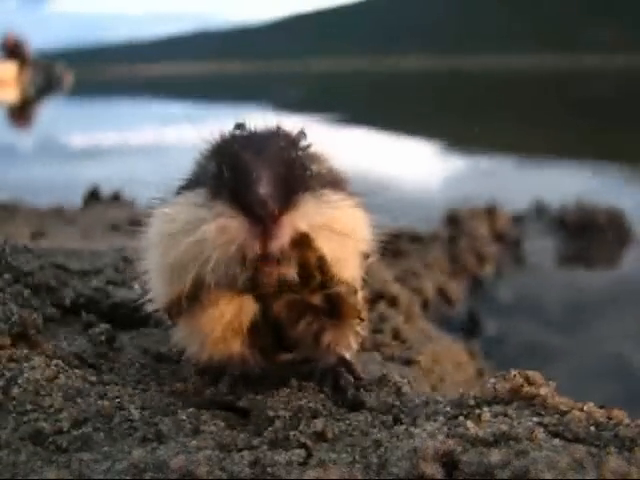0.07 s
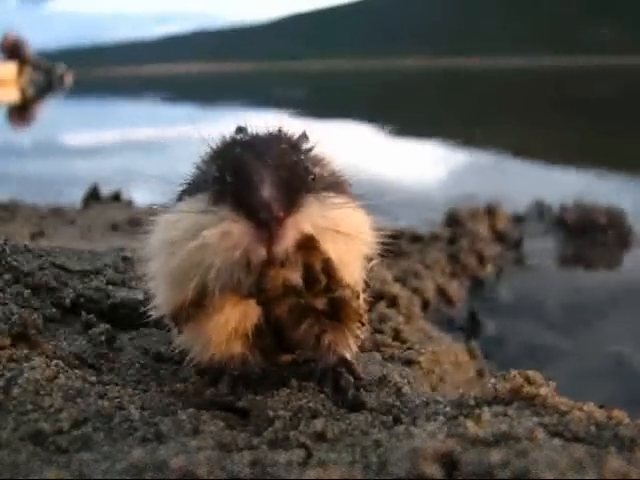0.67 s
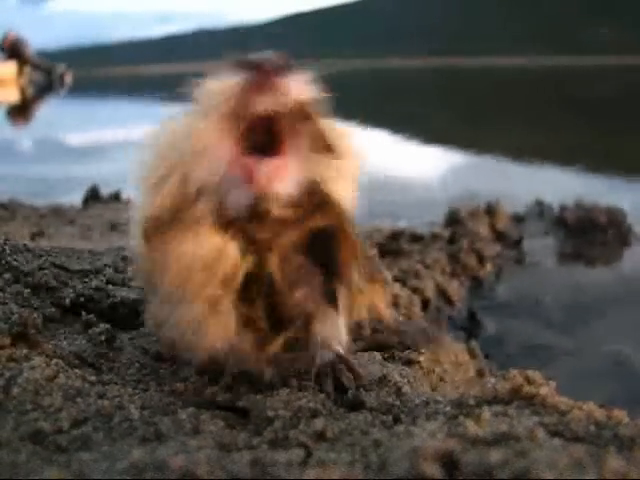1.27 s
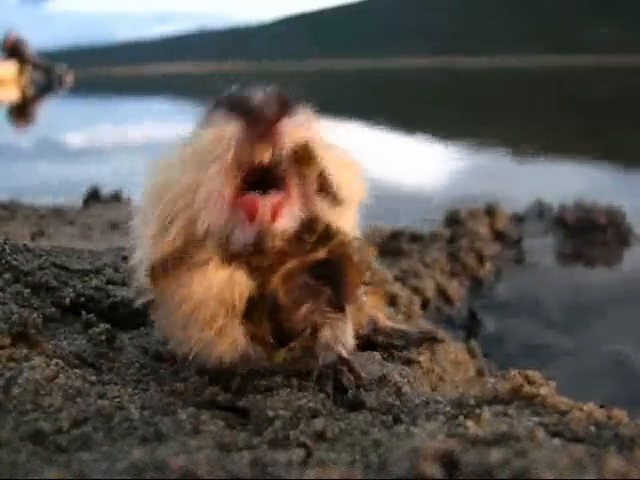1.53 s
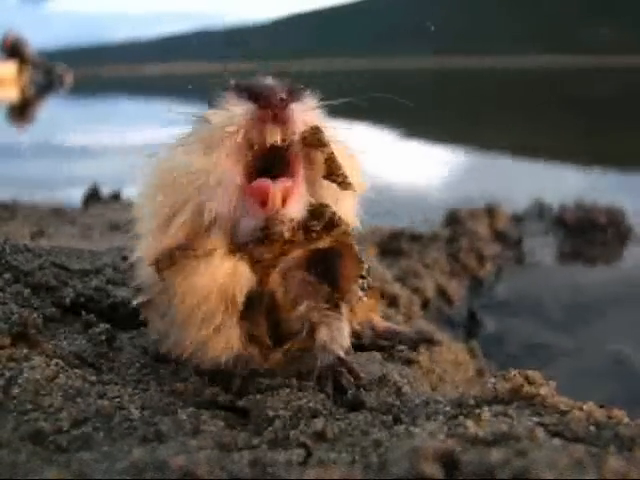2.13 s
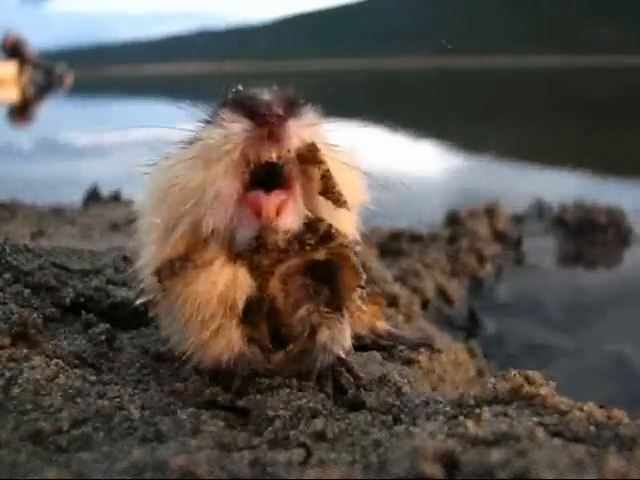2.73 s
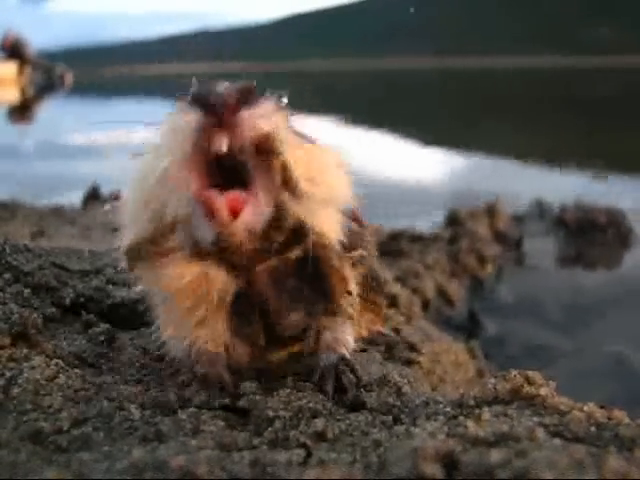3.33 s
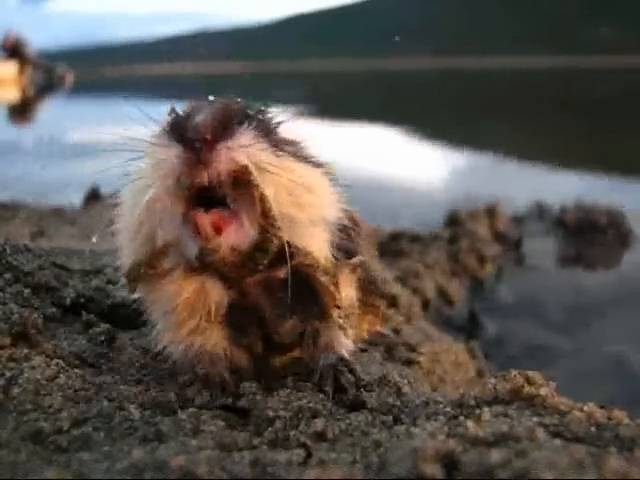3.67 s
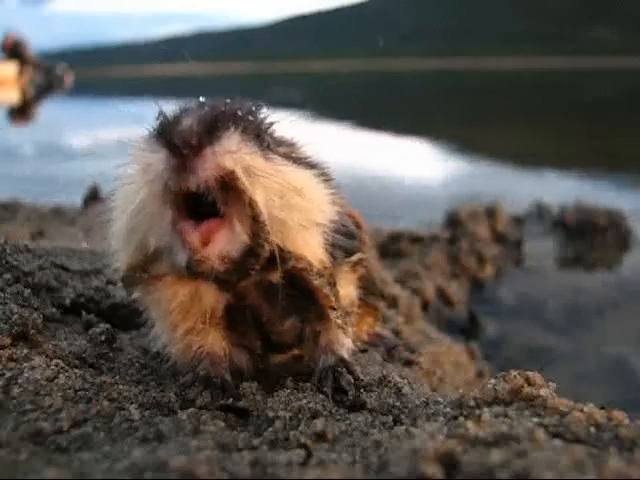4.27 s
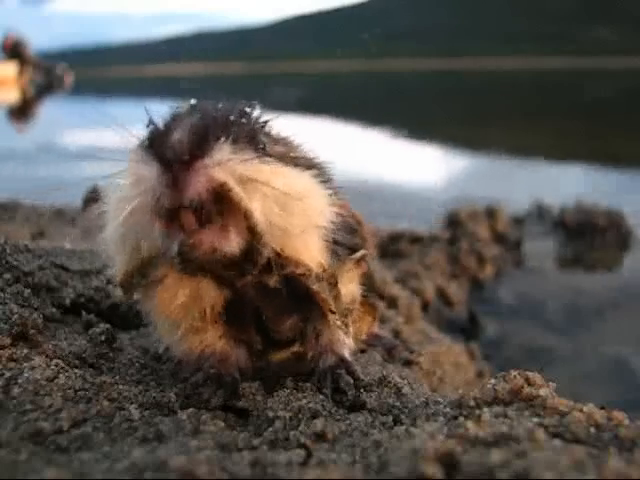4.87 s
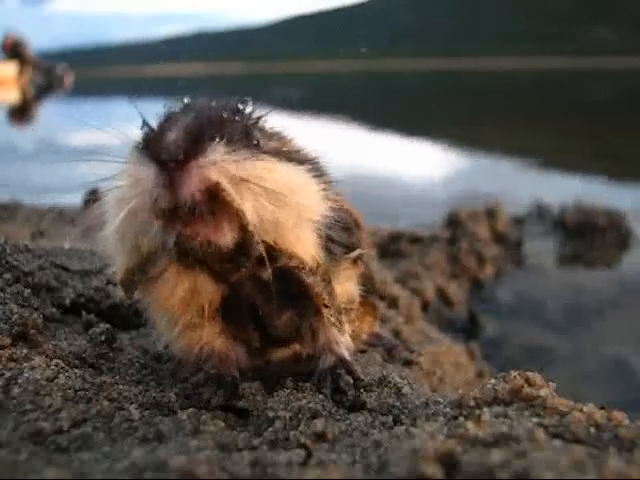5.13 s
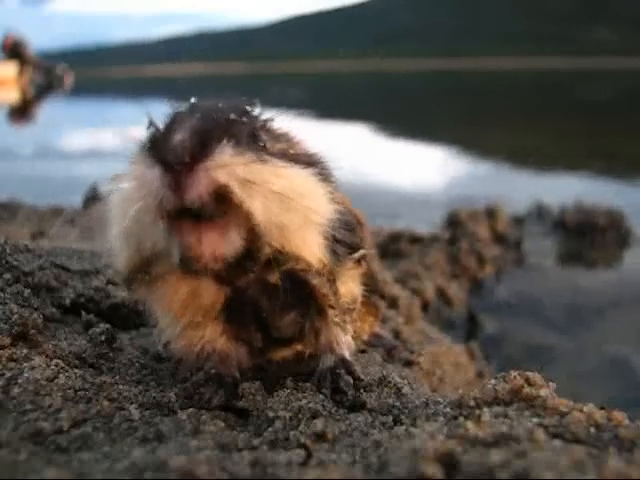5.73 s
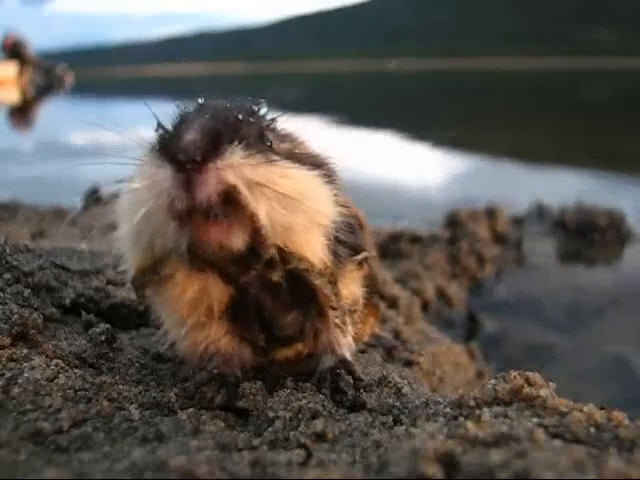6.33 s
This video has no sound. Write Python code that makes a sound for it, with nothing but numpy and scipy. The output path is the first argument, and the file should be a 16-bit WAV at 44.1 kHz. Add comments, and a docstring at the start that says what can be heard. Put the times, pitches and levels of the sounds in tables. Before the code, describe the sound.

A lemming a hand's width from the microphone gives a brief squeak and a few mouth ticks, then bursts into a fast, furious run of shrill squeaks, squeals and piercing shrieks. Hissy rasps, tiny grunts and quick gasps fall between the calls. The scolding thins out and ends with one more squeal and a small squeak. Faint air and wind rumble lie behind on a quiet lake shore.

```python
"""Shrill, furious scolding from a lemming a hand's width away, on a quiet lake shore. Its taut vocal
folds string together arched squeaks, held squeals and shrieks; between them the folds slacken into
rasps and low grunts, and it snatches air with a tick of the mouth. A low rumble and a soft thud sit
under each shriek and the last squeal. The microphone's two ports colour the treble differently.
Behind it lie faint air, wind rumble, a thin camera whine and a distant hum."""
import sys
import numpy as np
from scipy import signal
from scipy.fft import rfft, irfft, next_fast_len
from scipy.io import wavfile
from scipy.ndimage import uniform_filter1d

SR = 44100
rng = np.random.default_rng(int(sys.argv[2]) if len(sys.argv) > 2 else 0)


def generate_wav(signal):
    """Clip the signal to [-1, 1] and save it as 16-bit WAV at the path in sys.argv[1]."""
    frames = np.transpose(np.atleast_2d(signal))
    scaled = np.clip(frames, -1, 1) * 32767
    pcm = np.round(scaled).astype(np.int16)
    wavfile.write(sys.argv[1], SR, pcm)


N = 290795
T = np.arange(N) / SR

# quick in-breaths: start_s, length_s, level_db
GASPS = [(0.926, 0.075, -39.5), (1.182, 0.1, -31.5), (1.786, 0.11, -31.5), (2.337, 0.12, -32.5),
         (2.652, 0.092, -37), (2.964, 0.12, -27), (3.554, 0.12, -36.5), (3.864, 0.09, -38),
         (4.168, 0.097, -33), (5.72, 0.071, -42)]
# the highest calls: start_s, length_s, top_hz, climb_s, level_db, undertone_db, bite_db
SHRIEKS = [(1.438, 0.061, 10050, .007, -9, -43, 2.5), (2.052, 0.059, 9975, 0.009, -10, -45, 10.5),
           (3.256, 0.052, 10220, 0.0077, -10.5, -45, -12), (4.465, .084, 9994, 0.021, -11.5, -36, 23.5),
           (4.747, 0.088, 9020, 0.026, -10, -13, 11)]
# resonance of the open mouth, strongest at 7-8.5 kHz: freq_hz, gain_db
MOUTH_EQ = [(3000, -16.5), (4500, -21), (6000, -15), (7200, 2), (8500, 4), (10000, -17.5), (11500, -6)]
# hiss through the mouth in a rasp: freq_hz, gain_db
RASP_MOUTH_EQ = [(1500, -22.5), (3300, 18.5), (4700, -25), (6000, 0), (7400, 18), (8800, 11), (11000, -52)]
# hiss through the mouth forced wide open: freq_hz, gain_db
WIDE_MOUTH_EQ = [(400, -12), (1500, -7), (3200, -2.5), (4800, 3.5), (5800, 4.5), (7500, 13.5), (8800, 3.5),
                 (10000, 0.5), (11500, -50.5)]
# air and clicks at the teeth: freq_hz, gain_db
TEETH_EQ = [(400, -5), (3500, -9.5), (5500, 9), (7200, 16), (9000, 11), (11000, -6)]


def undb(db):
    """Decibels to gain."""
    return 10 ** (np.asarray(db) / 20)


def unit(x):
    """Scale to rms 1."""
    return x / np.sqrt(np.mean(x ** 2) + 1e-18)


def read(table, hz, column=1):
    """A column of a spectrum table at the given frequencies."""
    table = np.array(table)
    return np.interp(np.log(np.maximum(hz, 1)), np.log(table[:, 0]), table[:, column])


def colour(x, eq):
    """Shape a sound with an EQ curve."""
    size = next_fast_len(2 * len(x))
    return irfft(rfft(x, size) * undb(read(eq, np.fft.rfftfreq(size, 1 / SR))), size)[:len(x)]


def noise(eq):
    """Noise of rms 1, shaped by an EQ curve."""
    return unit(colour(rng.standard_normal(N), eq))


def smooth(x, hz):
    """One-pole lag."""
    keep = np.exp(-2 * np.pi * hz / SR)
    return signal.lfilter([1 - keep], [1, -keep], x)


def wander(hz):
    """Random drift of rms 1, rolled off above hz."""
    return unit(smooth(smooth(rng.standard_normal(N), hz), hz))


def span(start, length):
    """The samples of an event, and its progress u from 0 to 1."""
    where = np.arange(max(int(start * SR), 0), min(int((start + length) * SR), N))
    return where, np.linspace(0, 1, len(where))


def shore(side_db=-9, rumble_db=-13, whine_hz=8275, whine_db=-57):
    """Faint air over the lake, wind rumble at each port, and the camera's thin whine."""
    # tone of the open air: freq_hz, gain_db
    air_eq = [(15, -37.5), (25, 5), (700, 2.5), (2410, -2.5), (6110, -5.5), (8600, -2), (11200, -61),
              (14000, -83)]
    # background level, ducking after loud calls and recovering: time_s, level_db
    level_curve = [(0, -49.5), (1, -49), (2.5, -59), (3.7, -53), (4.2, -44), (5.3, -55.5), (5.85, -48),
                   (6.15, -59.5), (6.38, -49), (6.53, -38)]
    mid, side = noise(air_eq), noise(air_eq)
    rumble = np.array([wander(40), wander(40)])
    whine = wander(10) * np.sin(2 * np.pi * whine_hz * T)
    air = mid + undb(side_db) * side * np.array([[1], [-1]]) + undb(rumble_db) * rumble
    level_db = np.interp(T, *np.transpose(level_curve)) + 1.8 * wander(32)
    return air * undb(level_db) + undb(whine_db) * whine


def hum():
    """A faint low hum swells and fades in the distance."""
    # swells of the hum: start_s, length_s, pitch_hz, level_db
    swells = [(0.842, 0.25, 97, -54), (5.698, 0.18, 97, -53)]
    out = np.zeros(N)
    for start, length, hz, db in swells:
        where, u = span(start, length)
        envelope = np.abs(np.sin(np.pi * u)) ** .5
        out[where] += undb(db) * unit(envelope * np.sin(2 * np.pi * hz * T[where]))
    return out


def short_tail(x, db=-25, decay_s=.007):
    """A brief, faint, noisy smear after each call, different left and right."""
    t = T[:SR // 10]
    tail = rng.standard_normal((2, len(t))) * np.sqrt(t) * np.exp(-t / decay_s)
    tail /= np.linalg.norm(tail, axis=1, keepdims=True)
    return undb(db) * signal.fftconvolve(x[None], tail, axes=1)[:, :N]


def ports(x):
    """The camera body gives each microphone port its own notch and delay."""
    # left port against right: freq_hz, left_louder_db, left_lead_rad
    imbalance = [(2500, 0, 0), (4000, -3, 1), (4600, 1, 1.4), (5100, 9, 1.2), (5500, 3, -.9),
                 (6000, 0, -.9), (6500, -7, .6), (7200, 1, .3), (8000, -1, 0), (9000, -2, .7),
                 (11000, 1, 1.7)]
    hz = np.fft.rfftfreq(N, 1 / SR)
    lean = undb(read(imbalance, hz) / 2)
    left = lean * np.exp(.5j * read(imbalance, hz, column=2))
    pair_rms = np.sqrt((lean ** 2 + lean ** -2) / 2)
    return irfft(rfft(x) * np.array([left, 1 / left]) / pair_rms, N)


def thuds(shriek_db=-30, squeal_db=-23, squeal_s=(5.935, 5.968), thud_s=.0012, thud_db=8,
          rumble_db=-4, flutter_share=.45, flutter_hz=140, low_cut_hz=1.2):
    """A low rumble under each shriek and the last squeal, ending in a soft thud."""
    cues = [(start, start + length, shriek_db) for start, length, *_ in SHRIEKS]
    thud, gate = np.zeros((2, N))
    for start, end, db in cues + [(*squeal_s, squeal_db)]:
        thud += undb(db) * np.exp(-np.abs(T - end) / thud_s)
        gate += undb(db) * (T > start) * (T < end)
    flutter = wander(flutter_hz) + wander(flutter_hz) * np.array([[1], [-1]])
    rumble = smooth(gate, 33) * (1 + flutter_share * flutter)
    low_end = undb(thud_db) * thud + undb(rumble_db) * rumble
    return low_end - smooth(low_end, low_cut_hz)


def ticks(decay_s=.00024, over_gasp_db=13):
    """Tiny wet clicks ring in the mouth, alone or as it opens for a gasp."""
    # ticks of teeth and tongue: start_s, peak_db
    lone_ticks = [(0.4644, -11), (0.824, -24), (5.5376, -25), (6.335, -20)]
    out = np.zeros(N)
    for start, db in lone_ticks + [(start, db + over_gasp_db) for start, _, db in GASPS]:
        where, _ = span(start, .01)
        decay = np.exp(-(where - where[0]) / SR / decay_s)
        click = colour(rng.standard_normal(len(where)) * decay, TEETH_EQ)
        out[where] += undb(db) * click / np.abs(click).max()
    return out


def gasps(flutter_db=1.3, skew=.55, run_on_s=.025, run_on_db=-28.5):
    """Air past the teeth swells fast and dies away: drawn in, or running on after a shriek."""
    flow = np.zeros(N)
    run_ons = [(start + length, run_on_s, run_on_db) for start, length, *_ in SHRIEKS]
    for start, length, db in GASPS + run_ons:
        where, u = span(start, length)
        flow[where] += undb(db) * np.abs(np.sin(np.pi * u ** skew)) ** .54
    return flow * undb(flutter_db * wander(120)) * noise(TEETH_EQ)


def grunts(droop=.15, jitter=.033, shimmer_db=2.64, edge_s=.003, hiss_db=-12, harmonics=8):
    """The relaxed folds beat evenly and sag in pitch, with a small hiss on every beat."""
    # low voiced grunts: start_s, length_s, pitch_hz, level_db
    cues = [(0.715, 0.035, 393, -41), (1.071, 0.024, 428, -31), (2.57, 0.024, 460, -39),
            (2.816, 0.03, 463, -38), (2.862, 0.021, 448.7, -38), (3.783, 0.0314, 473.4, -38.5),
            (4.032, 0.023, 427.5, -34), (4.079, 0.032, 470, -32.5), (4.385, 0.026, 461, -49.5),
            (4.964, 0.025, 419, -38), (5.261, 0.024, 472, -35.5), (6.528, 0.024, 476.4, -26.5)]
    # resonance of the throat in a grunt: freq_hz, gain_db
    throat_eq = [(300, -3), (470, -0.5), (950, 2.5), (1400, -9), (2000, -11.5), (3000, -8.5), (4200, -55)]
    out, drift, air = np.zeros(N), wander(180), rng.standard_normal(N)
    for start, length, hz, db in cues:
        where, u = span(start, length)
        pitch = hz * np.exp(jitter * drift[where] - droop * (u ** 2 - 1 / 3))
        cycles = np.cumsum(pitch) / SR
        tone = sum(undb(read(throat_eq, k * pitch)) * np.sin(2 * np.pi * k * cycles)
                   for k in range(1, harmonics + 1))
        hiss = colour(air[where] * np.exp(-(cycles % 1)), RASP_MOUTH_EQ)
        edges = np.minimum(np.minimum(u, 1 - u) * length / edge_s, 1)
        out[where] += undb(db) * unit(edges * (unit(tone) + undb(hiss_db) * unit(hiss)))
    return out * undb(shimmer_db * wander(145))


def slap_cycles(slap_hz=390, jitter=.24):
    """Running count of the uneven slaps of the slack folds."""
    return np.cumsum(slap_hz * np.exp(jitter * wander(350))) / SR


def breaks():
    """How far the forced tone is broken up, 0 to 1."""
    # cracks in the voice: start_s, length_s, depth (0-1)
    cracks = [(1.085, .008, 0.86), (1.576, 0.013, 0.7), (2.193, 0.077, 0.36), (3.401, 0.017, 0.3),
              (4.327, 0.0096, 0.5), (4.38, 0.016, 0.98)]
    broken = np.zeros(N)
    for start, length, depth in cracks:
        broken[span(start, length)[0]] = depth
    return smooth(broken, 200)


def rasps(sung, cycles, scatter_db=-1.5, hiss_cycles=.79, throat_air=.38, edge_s=.0067, switch_s=.004,
          trade=.42, throat_duck_db=-16, mouth_duck_db=-9, wide_db=-22,
          catch_lead_s=.0058, catch_s=.001, catch_throat_db=-43, catch_mouth_db=-21):
    """Each slap of the slack folds rings the throat and lets a hiss through the mouth."""
    # rasping outbursts: start_s, length_s, throat_db, mouth_end_db, mouth_change_db
    outbursts = [(0.04, 0.012, -27, -19.5, 18), (0.219, 0.013, -42.5, -61, -6),
                 (1.066, 0.019, -20, -33.5, 14), (1.297, 0.03, -21.5, -22, 1.5),
                 (1.318, 0.061, -28.5, -11, 12), (1.532, 0.016, -40, -11.5, 25),
                 (1.576, .016, -40, -23.5, 17), (1.68, 0.038, -47.5, -25.5, -5),
                 (1.924, 0.09, -26.5, -10.5, 14.5), (2.147, 0.14, -48, -21.5, 4),
                 (2.464, 0.1, -34.5, -28.5, 2), (2.784, 0.14, -34.5, -31, -6),
                 (3.078, 0.025, -24.5, -2.5, 25), (3.338, 0.038, -44, -21.5, 9.5),
                 (3.394, 0.013, -48.5, -18.5, 6), (3.705, 0.061, -48.5, -41, -26.5),
                 (4.027, 0.034, -32, -37.5, 3), (4.288, 0.1164, -32.5, -30.5, -10),
                 (4.631, 0.067, -43, -42.5, -9), (4.885, 0.057, -58, -53, -31.5),
                 (5.903, 0.014, -23.5, -14, 6.5)]
    # resonance of the throat in a rasp: freq_hz, gain_db
    throat_eq = [(250, -18.5), (460, 0.5), (650, 1.5), (900, 8.5), (1450, -2), (3100, 0.5), (4500, -33.5),
                 (6500, -49)]
    # the voice catches just before each shriek
    catches = [(start - catch_lead_s, catch_s, catch_throat_db, catch_mouth_db, 0)
               for start, *_ in SHRIEKS]
    count = cycles.astype(int)
    strength = undb(scatter_db * rng.standard_normal(N))[count]
    slaps = np.diff(count, prepend=0) * strength
    hiss = np.exp(-(cycles % 1) / hiss_cycles) * strength * np.tanh(rng.standard_normal(N))
    throat, mouth, singing = np.zeros((3, N))
    for start, length, throat_db, mouth_db, change_db in outbursts + catches:
        where, u = span(start - .002, length + .004)
        wide = min(undb(mouth_db - wide_db) ** 2, 1)  # the mouth opens wider when forced
        edges = np.minimum(np.minimum(u, 1 - u) * length / edge_s, 1)
        air = hiss[where] * edges
        ring = unit(colour(slaps[where] * edges + throat_air * air, throat_eq))
        rush = unit(wide * colour(air, WIDE_MOUTH_EQ) + (1 - wide) * colour(air, RASP_MOUTH_EQ))
        # the throat fades as the hiss grows, and the other way round
        throat[where] += undb(throat_db - trade * change_db * (u + .5)) * ring
        mouth[where] += undb(mouth_db + change_db * (u - 1)) * rush
    # unbroken singing ducks the rasp
    for where, *_ in sung:
        singing[where] = 1
    singing = uniform_filter1d(singing, int(switch_s * SR)) * (1 - breaks())
    return throat * undb(throat_duck_db * singing) + mouth * undb(mouth_duck_db * singing)


def squeak(start, length, crest_hz, crest, db, octave_db, rise_oct=.68, fall_oct=.95, scoop_oct=.25,
           attack_s=.0008, release_s=.005, fade_db=-4):
    """An arch of pitch; the mouth lifts whichever harmonic sweeps through its resonance."""
    where, u = span(start, length)
    off_crest = np.where(u < crest, (crest - u) / crest, (u - crest) / (1 - crest))
    depth_oct = np.where(u < crest, rise_oct * crest, fall_oct * (1 - crest))
    onset = np.exp(-u * length / attack_s)
    pitch = crest_hz * 2 ** (-depth_oct * off_crest ** 2 - scoop_oct * onset)
    effort = (1 - onset) * (1 - np.exp((u - 1) * length / release_s)) * undb(fade_db * u)
    tone = effort * undb(read(MOUTH_EQ, pitch))
    octave = effort * undb(read(MOUTH_EQ, 2 * pitch) + octave_db)
    gain = undb(db) / np.sqrt(np.mean(tone ** 2 + octave ** 2))
    return where, pitch, gain * tone, gain * octave, np.zeros_like(tone)


def squeal(curve, octave_db, doubled_s, undertone_db=-16):
    """A held call that starts with a doubled period, giving an undertone at half the pitch."""
    times, hz, db = np.transpose(curve)
    where, _ = span(times[0], times[-1] - times[0])
    tone = undb(np.interp(T[where], times, db)) / np.hypot(1, undb(octave_db))
    undertone = tone * undb(undertone_db) * (T[where] < times[0] + doubled_s)
    return where, np.interp(T[where], times, hz), tone, tone * undb(octave_db), undertone


def shriek(start, length, top_hz, climb_s, db, undertone_db, bite_db, scoop=.21, climb=.12, dive=.39,
           scoop_s=.004, dive_share=.085, bite_s=.0012, resonance=.22, octave_db=-35):
    """A call that bursts out, climbs, holds and dives, lifted by the gaping mouth's weak resonance."""
    where, u = span(start, length)
    t = u * length
    rising = scoop * np.exp(-t / scoop_s) + climb * np.exp(-t / climb_s)
    diving = dive * np.exp((u - 1) / dive_share)
    pitch = top_hz * (1 - rising - diving)
    bite = undb(bite_db * np.exp(-t / bite_s))
    tone = undb(db) * unit(undb(resonance * read(MOUTH_EQ, pitch))) * bite
    undertone = tone * undb(undertone_db) * np.sin(np.pi * u ** 2) ** 2
    return where, pitch, tone, tone * undb(octave_db), undertone


def calls():
    """All sung calls in time order: (samples, pitch, gains of fundamental, octave and undertone)."""
    # arched squeaks: start_s, length_s, crest_hz, crest_position (0-1), level_db
    squeaks = [(0, 0.014, 3760, 0.46, -24), (0.147, .022, 2308, .6, -42),
               (1.0418, 0.038, 3837, 0.48, -15.5), (1.086, 0.036, 4976, 0.9, -19.5),
               (1.124, 0.03, 4100, 0.14, -19), (1.312, 0.036, 4900, 0.39, -13.5),
               (1.696, 0.015, 4416, 0.47, -21), (1.934, 0.029, 3500, 0.45, -15.5),
               (2.167, 0.035, 5520, 0.42, -17.5), (2.203, 0.035, 5050, 0.27, -19.5),
               (2.252, 0.027, 4330, 0.22, -15.5), (2.483, 0.031, 3700, 0.44, -13),
               (2.535, 0.027, 3573, 0.38, -19.5), (2.79, 0.032, 2847, 0.37, -28),
               (2.839, 0.038, 3630, 0.35, -15.5), (2.898, 0.027, 2950, 0.64, -31),
               (3.475, 0.038, 5070, 0.06, -21.5), (3.709, 0.03, 3950, 0.22, -14.5),
               (3.757, 0.031, 2750, 0.28, -31.5), (4.002, 0.033, 3227, 0.3, -21),
               (4.3, 0.036, 4420, 0.39, -15.5), (4.347, 0.041, 4240, 0.31, -16.5),
               (4.588, 0.062, 4605, 0.24, -25.5), (4.645, 0.036, 3820, 0.39, -24),
               (4.887, 0.033, 4200, 0.15, -25), (4.935, 0.025, 3110, 0.37, -31),
               (5.232, 0.013, 2740, 0.28, -31.5), (6.034, 0.021, 3204, 0.34, -38),
               (6.494, 0.019, 2750, 0.08, -29.5)]
    # the mouth's gape, as the gain it gives a squeak's octave: time_s, gain_db
    gape = [(0, -24.5), (1.1, -27), (2.2, -9), (3.7, -12), (4.5, -21), (5.2, -11.5), (6.1, -39)]
    # squeals held near 5.5 kHz, one curve each: time_s, pitch_hz, level_db
    squeal_curves = [
        [(1.365, 4930, -19.5), (1.375, 5156, -9), (1.391, 4910, -15), (1.419, 5285, -12.5), (1.428, 4684, -33)],
        [(1.549, 5550, -11.5), (1.568, 5690, -14.5), (1.584, 5500, -16.5), (1.606, 5934, -14.5),
         (1.666, 5490, -19), (1.68, 4500, -22.5)],
        [(1.981, 4040, -15), (1.991, 4700, -25.5), (2.029, 4960, -19.5), (2.038, 4540, -29)],
        [(3.098, 5925, -9), (3.116, 6240, -17), (3.124, 5720, -10), (3.146, 5650, -13.5), (3.168, 6050, -10),
         (3.204, 5420, -16), (3.236, 5625, -9), (3.244, 5500, -41.5)],
        [(3.361, 5670, -10.5), (3.379, 6040, -16), (3.389, 5480, -22.5), (3.425, 5527, -12),
         (3.469, 5443, -20.5), (3.478, 5147, -23)],
        [(5.919, 5330, -13), (5.935, 5700, -21.5), (5.959, 7000, -8.5), (5.974, 5760, -21)],
    ]
    # timbre of each squeal: octave_db, doubled_period_length_s
    squeal_timbres = [(-7.5, 0), (-10.5, 0.0033), (-4, 0.0035), (-58.5, .022), (-55, 0.025),
                      (-45.5, 0.00048)]
    sung = [squeak(*row, np.interp(row[0], *np.transpose(gape))) for row in squeaks]
    sung += [shriek(*row) for row in SHRIEKS]
    sung += [squeal(curve, *timbre) for curve, timbre in zip(squeal_curves, squeal_timbres)]
    return sorted(sung, key=lambda call: call[0][0])


def scratch(hz, phase, tone, from_hz=6000, aliased_db=-35, air_db=-25):
    """The shrillest tones carry forced air; harmonics 4 and 5 alias into faint sliding whistles."""
    shrill = smooth(tone * (hz > from_hz), 200)
    aliased = unit(np.sin(5 * phase) + .5 * np.sin(4 * phase))
    return shrill * (undb(aliased_db) * aliased + undb(air_db) * noise(WIDE_MOUTH_EQ))


def taut_folds(sung, jitter=.0074, waver=.0077, shimmer_db=1.6, rough=.25, third_db=-19,
               air_db=-25, air_s=.045, onset_rough=2.5, onset_s=.00067):
    """Taut vocal folds sing the calls, with a little unsteadiness and leaking air."""
    hz = np.full(N, sung[0][1][0])
    slack, under = np.zeros((2, N))
    gains = np.zeros((3, N))
    for where, pitch, tone, octave, undertone in sung:
        effort = np.hypot(tone, octave)
        # the weak third harmonic shows only inside the mouth's resonance
        third = effort * undb(third_db + 2 * read(MOUTH_EQ, 3 * pitch))
        gains[:, where] = tone, octave, third
        # the folds are least steady when their strongest tone is low, and before they settle
        centre_hz = pitch * (1 + np.sum(octave ** 2) / np.sum(effort ** 2))
        unsettled = 1 + onset_rough * np.exp(-(where - where[0]) / SR / onset_s)
        slack[where] = (4000 / centre_hz) ** 2 * unsettled
        hz[where[0]:] = pitch[-1]
        hz[where], under[where] = pitch, undertone
    unsteady = np.sqrt(slack)
    hz = smooth(hz, 2200) * (1 + (jitter * wander(290) + waver * wander(48)) * unsteady)
    # strain scatters each cycle a little: a haze round the tone, wider round its octave
    phase = 2 * np.pi * np.cumsum(hz) / SR + rough * unsteady * wander(900) / 2
    gains = smooth(smooth(gains, 800), 800)
    voice = sum(np.sqrt(2) * gain * np.sin(k * phase) * (k * hz < SR / 3)
                for k, gain in enumerate(gains, 1))
    voice += 2 * smooth(under, 170) * np.sin(phase) * np.cos(phase / 2)
    shimmer = undb(shimmer_db * np.minimum(unsteady, 1) * wander(45))
    flutter = 1 + rough * slack * wander(700)
    # air starts to rush just before the folds sing and outlasts them; slack folds leak more of it
    size = int(air_s * SR)
    leak = undb(air_db) * uniform_filter1d(uniform_filter1d(gains.sum(axis=0) * unsteady, size), size)
    return voice * shimmer * flutter + scratch(hz, phase, gains[0]) + leak * noise(WIDE_MOUTH_EQ)


def chopped(voice, cycles, spurt_cycles=.4):
    """In a break the tone comes in spurts, one with each slap."""
    spurts = unit(smooth(np.exp(-(cycles % 1) / spurt_cycles), 1200))
    return voice * (1 + breaks() * (spurts - 1))


def scene():
    """The lemming close in front, the shore behind."""
    sung, cycles = calls(), slap_cycles()
    lemming = chopped(taut_folds(sung), cycles) + rasps(sung, cycles) + grunts() + gasps() + ticks()
    return ports(lemming) + short_tail(lemming) + thuds() + shore() + hum()


def record(dry, gain_db=1, squash=.3, top_hz=11700):
    """The recorder squashes loud calls, clips at full scale and cuts the top."""
    driven = undb(gain_db) * dry / (1 + squash * np.abs(dry))
    lowpass = signal.ellip(10, .2, 70, top_hz, fs=SR, output="sos")
    return signal.sosfilt(lowpass, np.clip(driven, -1, 1))


dry = scene()
out = record(dry)
generate_wav(out)
```